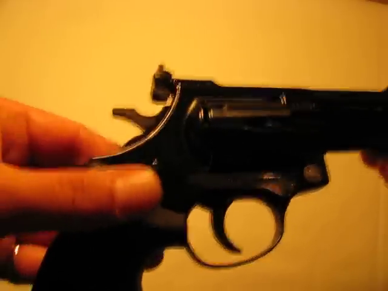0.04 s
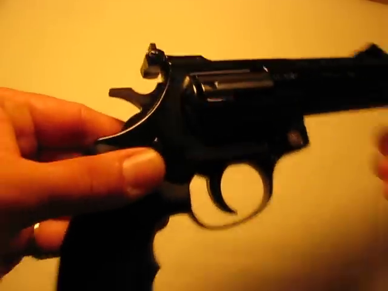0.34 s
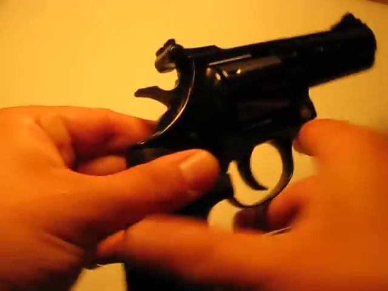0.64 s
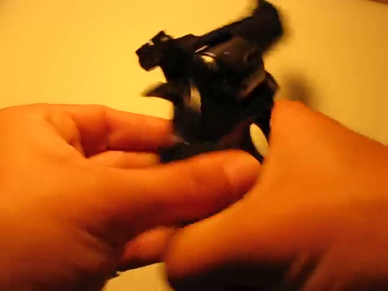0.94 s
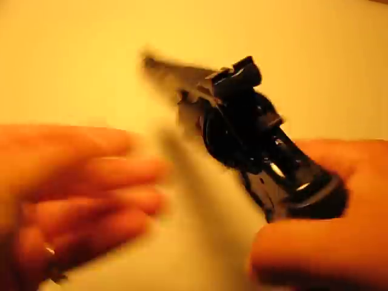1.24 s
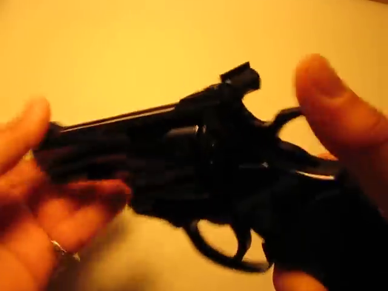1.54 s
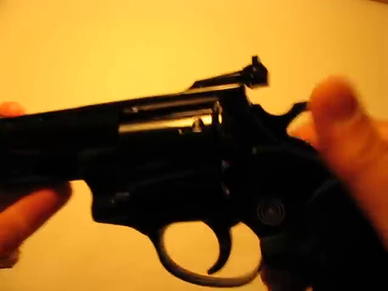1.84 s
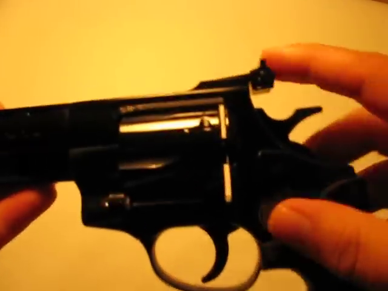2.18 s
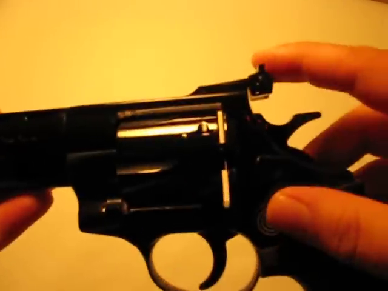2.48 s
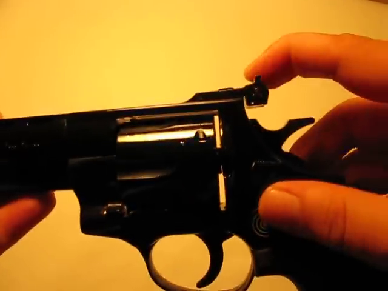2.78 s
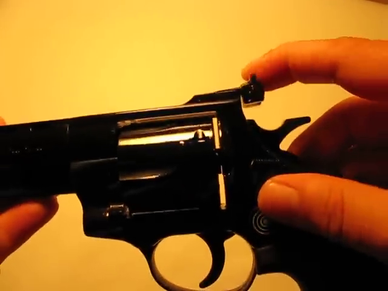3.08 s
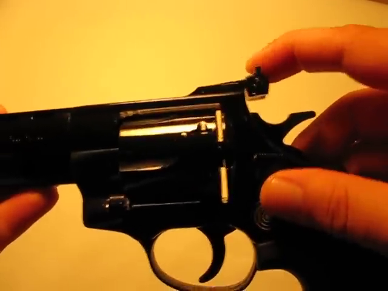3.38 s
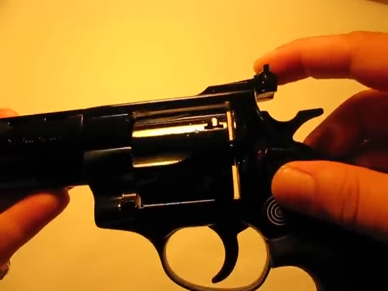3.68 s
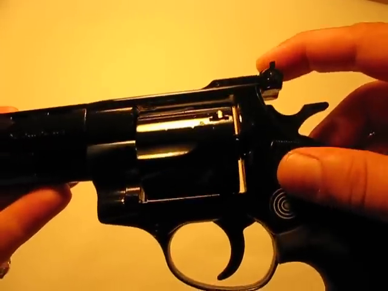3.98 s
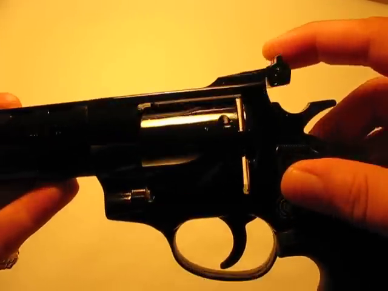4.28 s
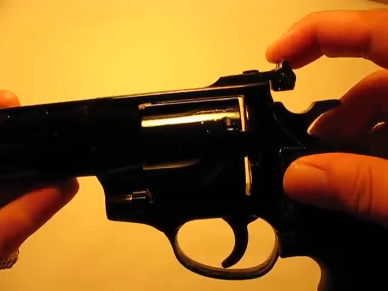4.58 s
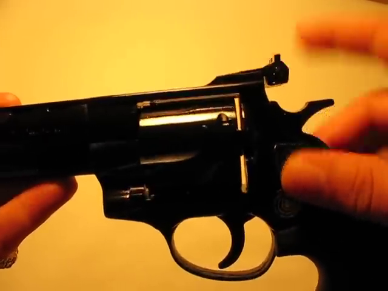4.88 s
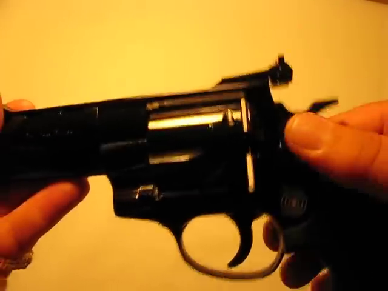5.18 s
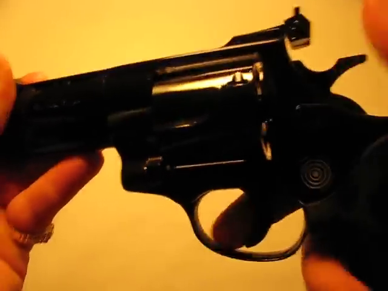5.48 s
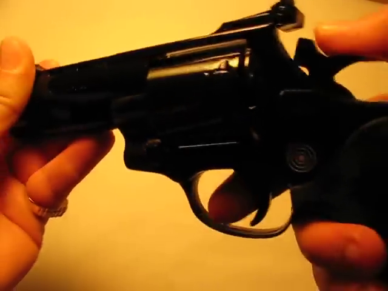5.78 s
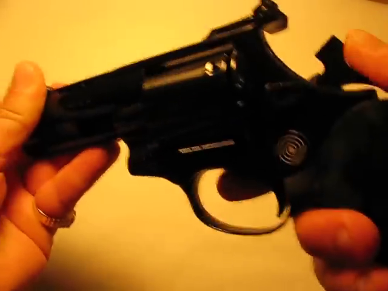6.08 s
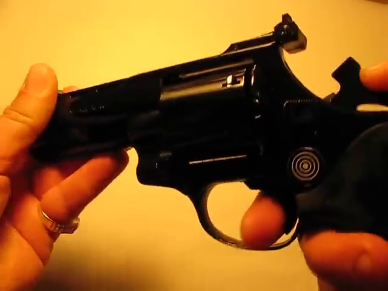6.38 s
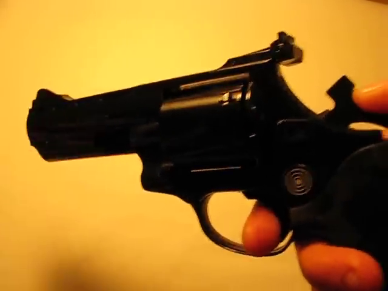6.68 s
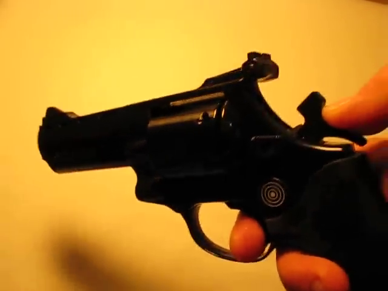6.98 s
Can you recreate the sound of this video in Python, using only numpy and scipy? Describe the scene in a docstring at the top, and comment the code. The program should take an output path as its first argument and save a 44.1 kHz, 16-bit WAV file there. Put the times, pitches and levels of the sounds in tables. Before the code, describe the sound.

A revolver bumps a table, its cylinder clicks round four times, then the hammer cocks with a hard metallic snap.

```python
"""Cocking an air revolver

Close up in a small room, hands slide over the steel and the grip thuds and clacks on a table.
The cylinder clicks through four notches with a ping; the hammer comes back on a ringing spring
and catches with a hard snap. The snap ducks the camera's gain; hiss and faint ticking creep back."""
import sys
import numpy as np
from scipy import signal
from scipy.fft import rfft, irfft, next_fast_len
from scipy.io import wavfile
from scipy.ndimage import uniform_filter1d

SR = 44100
rng = np.random.default_rng(int(sys.argv[2]) if len(sys.argv) > 2 else 0)


def wav_record(signal):
    """Record a signal, one row per channel, as 16-bit PCM in the file named by sys.argv[1]."""
    frames = np.transpose(np.atleast_2d(signal))
    bounded = np.clip(frames, -1, 1)
    # unit amplitude maps onto the largest positive 16-bit level
    quanta = np.round(bounded * 32767).astype(np.int16)
    wavfile.write(sys.argv[1], SR, quanta)


N = 319284
TIME = np.arange(N) / SR
HIT_TIME = np.arange(SR // 4) / SR


def amp(db):
    """Decibels to gain."""
    return 10 ** (np.asarray(db) / 20)


def unit_rms(x):
    """Scaled to rms 1."""
    return x / np.sqrt(np.mean(x ** 2) + 1e-20)


def unit_hit(x):
    """Scaled to the energy of 5 ms at rms 1."""
    return x * np.sqrt(.005 * SR / np.mean(np.sum(x ** 2, axis=-1)))


def curve(points, hz):
    """(frequency, value) points joined on a log frequency axis."""
    freqs, values = np.transpose(points)
    return np.interp(np.log(hz + 1), np.log(freqs + 1), values)


def add(track, at, x):
    """Mixes x into the track at a time in seconds."""
    part = track[:, round(at * SR):][:, :x.shape[-1]]
    part += x[..., :part.shape[1]]


def pan(db):
    """Left and right gains for a left-minus-right level."""
    return amp(np.vstack([db / 2, -db / 2]))


def filtered(x, response):
    """Equalises x with a gain that depends on frequency."""
    size = next_fast_len(x.shape[-1] + SR // 4)
    gain = response(np.fft.rfftfreq(size, 1 / SR))
    return irfft(rfft(x, size) * gain, size)[..., :x.shape[-1]]


# Stereo image of the air: (frequency [Hz], left-right correlation [0..1])
STEREO_LIKENESS = [(130, 0.95), (290, 0.9), (640, 0.44), (1410, .25), (3100, 0.28), (15000, 0.062)]

def stereo_noise(size):
    """White noise at two close microphones: alike in the bass, unrelated in the treble."""
    def mid_side_gains(hz):
        angle = np.arccos(np.clip(curve(STEREO_LIKENESS, hz), -1, 1)) / 2
        return np.array([np.cos(angle), np.sin(angle)])
    mid, side = filtered(rng.standard_normal((2, size)), mid_side_gains)
    return np.array([mid + side, mid - side])


def noise_bed(spectrum):
    """Steady coloured stereo noise of rms 1."""
    return unit_rms(filtered(stereo_noise(N), lambda hz: amp(curve(spectrum, hz))))


def strike(spectrum, t60, attack, width, snap=0):
    """A blow on a body: a sharp push of size snap, then dense dying modes; t60 and attack in seconds."""
    size = len(HIT_TIME)
    hz = np.fft.rfftfreq(size, 1 / SR)
    envelope = amp(-60 * HIT_TIME / t60) * (1 - np.exp(-HIT_TIME / attack))
    mid, side = rng.standard_normal((2, size)) * envelope
    burst = rfft(np.array([mid + width * side, mid - width * side]))
    local_power = uniform_filter1d(np.abs(burst) ** 2, int(4 / t60) + 1)
    burst /= np.sqrt(np.abs(local_power))  # even force across the band
    cepstrum = irfft(curve(spectrum, hz) * np.log(10) / 20, size)
    cepstrum[1:size // 2] *= 2
    cepstrum[size // 2:] = 0  # minimum phase: the body answers only after the push
    body = np.exp(rfft(cepstrum, size))
    fade = np.clip(3.8 - 4 * HIT_TIME / HIT_TIME[-1], 0, 1)
    return unit_hit(fade * irfft((burst + snap) * body, size))


def ring(modes, phase_spread=.5):
    """Free modes, struck a little differently each time; each reaches the two ears at its own phase."""
    t = np.arange(SR) / SR
    out = np.zeros((2, SR))
    for hz, db, t60 in modes:
        envelope = amp(db + rng.normal(0, 1) - 60 * t / t60)
        out += envelope * np.sin(2 * np.pi * hz * t + rng.normal(0, phase_spread, (2, 1)))
    return unit_hit(out)


# Decay of the small room: (frequency [Hz], t60 [s])
ROOM_DECAY = [(100, .42), (500, 0.24), (1200, 0.2), (2050, 0.42), (3000, 0.35), (4500, 0.3), (8000, .28),
              (15000, 0.16)]

def room_reverb(x):
    """The walls answer within milliseconds; the top of the treble dies first."""
    hz, t, spectra = signal.stft(stereo_noise(SR * 3 // 4), SR, nperseg=256)
    decay = amp(-60 * t / curve(ROOM_DECAY, hz)[:, None])
    tail = signal.istft(spectra * decay, SR, nperseg=256)[1]
    tail *= 1 - np.exp(-(np.arange(tail.shape[1]) / SR / .0033) ** 2)  # soft onset
    return signal.fftconvolve(x, tail / np.linalg.norm(tail[0]), axes=1)[:, :N]


# Colour of the noise floor: (frequency [Hz], relative level [dB])
FLOOR_EQ = [(20, -7), (40, 1.5), (70, -2.5), (160, -3.5), (250, -10), (350, -11), (470, -17.5), (560, -15),
            (750, -16), (1200, -17.5), (2060, -20.5), (8000, -26), (15800, -36)]
# Narrow bands of hum: (centre [Hz], width [Hz], relative level [dB])
HUM_BANDS = [(157, 11, -61), (440.4, 16, -66), (539.7, 8.3, -64), (590.8, 5.1, -66), (1030, 15, -68),
             (7800, 150, -75)]

def room_tone():
    """Room rumble and microphone hiss under a soft hum."""
    def hum_eq(hz):
        return sum(amp(db) / np.sqrt(width) * np.exp(-((hz - centre) / width) ** 2)
                   for centre, width, db in HUM_BANDS)
    floor = amp(-51.5) * noise_bed(FLOOR_EQ)
    hum = amp(-3.5) * np.sqrt(SR / 2) * filtered(stereo_noise(N), hum_eq)
    return floor + hum


def ticking(start_db=-51, fade_db_per_s=1.53):
    """Faint double ticks, ten pairs a second, slowly weakening."""
    out = np.zeros((2, N))
    tick_eq = [(150, -23), (350, 3.5), (600, -15.5), (850, -12.5),
               (1120, -2), (1400, -1), (1750, -21), (5000, -36.5)]
    for at in np.arange(.037, N / SR, .1):
        for delay in (0, .021):
            db = start_db - fade_db_per_s * at + rng.normal(0, 2.7)
            add(out, at + delay, amp(db) * strike(tick_eq, t60=.046, attack=.002, width=.18))
    return out


def swell(at, half_length, db):
    """A bell-shaped rise and fall in level."""
    return amp(db) * np.exp(-((TIME - at) / half_length) ** 2)


def low_swell():
    """A soft bass bloom just after the snap."""
    bass = noise_bed([(40, -22.5), (72, 2), (110, -23), (400, -72)])
    return swell(at=6.24, half_length=.22, db=-47.5) * bass


# A hand slides along the steel: (time [s], half length [s], level [dB])
HAND_STROKES = [(1.023, 0.082, -46.5), (1.77, 0.096, -57), (2.144, 0.032, -58.5), (5.4, 0.032, -55),
                (5.535, 0.043, -52), (5.783, 0.042, -51.5)]
# The grip shifts in the hand: (time [s], half length [s], level [dB])
GRIP_SHIFTS = [(1.6, .5, -51.5), (2.65, 0.4, -55), (5.72, 0.16, -54.5)]
# Whisper of skin on steel: (frequency [Hz], relative level [dB])
SKIN_EQ = [(900, -20.5), (1600, -6), (2000, -1.5), (2330, 3), (2700, -3), (3600, -3), (5200, -2),
           (8000, -8), (15000, -17)]

def hands(hold_db=-63, brush_db=-10, rasp_db=2):
    """Skin sticks and slips over the steel; a still hand rumbles, and each shift adds rumble and brush."""
    shifting = sum(swell(*shift) for shift in GRIP_SHIFTS)
    sliding = sum(swell(*stroke) for stroke in HAND_STROKES) + amp(brush_db) * shifting
    stick_slip = unit_rms(uniform_filter1d(rng.standard_normal(N), size=300))
    rumble_eq = [(25, -13), (100, 3.5), (200, -3.5), (450, -9), (900, -15), (3000, -32.5)]
    rumble = (amp(hold_db) + shifting) * noise_bed(rumble_eq)
    return rumble + sliding * amp(rasp_db * stick_slip) * noise_bed(SKIN_EQ)


# The grip lands: (time [s], relative level [dB], hardness [dB], clack pitch [ratio])
GRIP_LANDINGS = [(0.0412, -26, 13, 1.007), (0.0517, -32.5, 9.5, 1.04), (2.269, -25.5, -3, 1.195),
                 (2.574, -36, -11, 1.1), (2.608, -41.5, -14, 1), (2.836, -34.5, -10, 0.82),
                 (3.147, -33.5, -7.5, 1.05), (5.025, -23.5, 9, 1.177)]
# Deep thud, hard clack and bright gun rattle: (frequency [Hz], relative level [dB])
THUD_EQ = [(25, -10), (80, 6.5), (135, 2.5), (175, -1), (230, 1.5), (310, -3.5), (480, -14), (900, -20.5),
           (2000, -50.5)]
CLACK_EQ = [(200, -24.5), (430, -6.5), (570, -7), (690, -1), (850, -7.5), (1000, -10), (1200, 0.5),
            (1380, -15), (3000, -21.5), (8000, -54)]
RATTLE_EQ = [(900, -28.5), (2000, -6), (2900, -3.5), (3600, -4.5), (4300, -3.5), (4650, 0.5), (5200, -7.5),
             (7500, -14), (10000, -13), (15500, -25)]
# Short ring of table top and gun body: (frequency [Hz], relative level [dB], t60 [s])
TABLE_RING = [(492, -5, 0.093), (712, 2.5, 0.097), (860, -1, 0.038), (1026, -4.5, 0.077), (1134, -7, 0.026),
              (1364, -2, 0.074), (1500, -0.5, .05)]
GUN_RING = [(2890, -7, 0.031), (3898, -7, 0.051), (4640, -4, 0.04), (7450, -9.5, 0.033)]
# Placement of the bumps: (frequency [Hz], left minus right [dB])
BUMP_PAN = [(200, 2), (400, 0.5), (700, 4), (1290, -6.5), (2400, 2), (8000, -0.5)]

def table_bumps(rattle_db_per_octave=19.5):
    """The table top thuds under the grip; a hard landing also clacks and rattles the gun."""
    out = np.zeros((2, N))
    for at, db, hardness_db, pitch in GRIP_LANDINGS:
        contact = at + .0034  # the grip gives way before the hard contact
        clack_eq = [(hz * pitch, level) for hz, level in CLACK_EQ]  # stiffer sounds higher
        clack_db = db + hardness_db
        damping_db = 1.9 * min(hardness_db, 0)  # a soft landing smothers the rattle
        rattle_db = clack_db - 6 + rattle_db_per_octave * np.log2(pitch) + damping_db
        add(out, at, amp(db + 4) * strike(THUD_EQ, t60=.19, attack=.00048, width=.25, snap=.33))
        add(out, contact, amp(clack_db) * strike(clack_eq, t60=.037, attack=.0017, width=.77, snap=.17))
        add(out, contact, amp(clack_db - 9) * ring(TABLE_RING, phase_spread=.7))
        add(out, contact, amp(rattle_db) * strike(RATTLE_EQ, t60=.025, attack=.0018, width=.9))
        add(out, contact, amp(rattle_db - 10.5) * ring(GUN_RING, phase_spread=.99))
    return filtered(out, lambda hz: pan(curve(BUMP_PAN, hz)))


# The stop drops into a notch: (time [s], relative level [dB], ring offset [dB])
NOTCH_CLICKS = [(3.0942, -17.5, -6.5), (3.6464, -18.5, -2.5), (4.1819, -27, -3.5), (4.725, -17.5, -2.2)]
# Crisp click of the stop, and the ping off the walls: (frequency [Hz], relative level [dB])
STOP_EQ = [(300, -53.5), (620, -13.5), (1200, -27), (1650, -12), (2050, -11.5), (2600, -10), (3600, -13.5),
           (4700, -22), (5500, -2), (7000, -1.5), (7650, -11.5), (8350, -2), (10000, -16.5), (14000, -21.5),
           (16000, -30)]
ECHO_EQ = [(1500, -30), (1880, -20), (1990, -5), (2060, -9), (2150, -13.5), (2350, -33), (3000, -49)]
# Ping of the cylinder: (frequency [Hz], relative level [dB], t60 [s])
CYLINDER_RING = [(2020, 3.5, 0.041), (2100, -7, .025), (1572, -17.5, 0.09), (5940, -8, 0.015),
                 (6670, -9.5, 0.031), (8200, -10, 0.036)]
# Wall echoes: (delay [s], level against the ping [dB])
WALL_ECHOES = [(.024, -12.5), (0.111, -29.5)]

def cylinder(rebound_s=.0032):
    """The stop snaps into each notch, rebounds once and rings the cylinder; the walls return the ping."""
    out = np.zeros((2, N))
    for at, db, ring_db in NOTCH_CLICKS:
        add(out, at, amp(db + .4) * strike(STOP_EQ, t60=.009, attack=.0002, width=.8, snap=1.1))
        add(out, at + rebound_s, amp(db - 7) * strike(STOP_EQ, t60=.026, attack=.00016, width=.44))
        add(out, at, amp(db + ring_db) * ring(CYLINDER_RING, phase_spread=.75))
        for delay, wall_db in WALL_ECHOES:
            echo = strike(ECHO_EQ, t60=.15, attack=.003, width=.6)
            add(out, at + delay, amp(db + ring_db + wall_db) * echo)
    placement = [(1000, -1), (2000, -2), (4500, -1), (8000, 2.5)]
    return filtered(out, lambda hz: pan(curve(placement, hz)))


# Contacts inside the lock work: (time [s], level [dB], brightness [dB/octave])
LEVER_TICKS = [(1.7121, -35, -3.5), (5.6146, -50.5, -1.5), (5.6895, -35.5, 6.5), (5.7535, -38, 1),
               (5.7707, -29.5, 0.5), (5.7805, -37.5, -3), (5.792, -35.5, -3), (5.7982, -39.5, -4.5),
               (5.848, -15.5, 5.5), (5.9328, -16, -3.5), (7.0664, -35, -.5)]
# Dry lever tick and sizzling spring clash: (frequency [Hz], relative level [dB])
LEVER_EQ = [(400, -20.5), (800, -18), (1400, -8), (2350, -4), (3200, -4.5), (4600, -0.5), (5600, 0.5),
            (7700, -6), (11000, -15), (16000, -27)]
SPRING_EQ = [(7500, -44), (9600, -16.5), (11400, -12), (12000, -2), (12330, 4.5), (12700, -10),
             (13400, -13), (15500, -25)]
# Thin spring twang and long frame ring: (frequency [Hz], relative level [dB], t60 [s])
SPRING_MODES = [(12460, -4, .17), (12240, -9, .14)]
FRAME_MODES = [(2164, -8.5, 1.3), (4140, -3, 0.91), (2050, 1, .35), (7940, -12, .45)]

def lock_work(slack_db=-32, clash_growth=2.96):
    """Levers tick and ring the frame; contacts harder than the slack also clash and twang the spring."""
    out = np.zeros((2, N))
    for at, db, tilt in LEVER_TICKS:
        tick_eq = [(hz, level + tilt * np.log2(hz)) for hz, level in LEVER_EQ]  # sharper is brighter
        add(out, at, amp(db) * strike(tick_eq, t60=.018, attack=.00024, width=.42, snap=.32))
        add(out, at, amp(db - 26.5) * ring(FRAME_MODES))
        force_db = db - slack_db
        if force_db > 0:
            clash = strike(SPRING_EQ, t60=.012, attack=.0001, width=.62, snap=1)
            add(out, at, amp(-50 + clash_growth * force_db) * pan(5.7) * clash)
            add(out, at, amp(db - 7.5) * ring(SPRING_MODES, phase_spread=.68))
    return out


# Hard snap at full cock: (frequency [Hz], relative level [dB])
SNAP_EQ = [(90, -22.5), (200, -23), (600, -13.5), (1100, -28), (2000, -10), (2800, -11), (3450, -.5),
           (4000, -1.5), (4600, -.5), (5700, -6.5), (6900, -10), (7900, -5), (10000, -17.5), (12400, -15.5),
           (16000, -27)]

def sear(scrape_at=5.908, catch_at=5.9599, catch_db=7.5):
    """The sear scrapes along the hammer, then catches it with a snap that rings the frame."""
    out = np.zeros((2, N))
    scrape_eq = [(2000, -24), (6000, -16.5), (9500, .5), (12300, -3), (15500, -17)]
    add(out, scrape_at, amp(-24.5) * strike(scrape_eq, t60=.12, attack=.02, width=.81))
    add(out, catch_at, amp(catch_db) * strike(SNAP_EQ, t60=.0052, attack=.00015, width=.4, snap=.94))
    add(out, catch_at, amp(catch_db - 11) * strike(SNAP_EQ, t60=.017, attack=.001, width=.7))
    add(out, catch_at, amp(catch_db - 38.5) * ring(FRAME_MODES))
    return out


def hammer():
    """The hammer comes back through the ticking lock work until the sear holds it."""
    placement = [(1000, -.5), (3400, -3), (4500, 1.5), (8000, 1.5), (12000, -.5)]
    return filtered(lock_work() + sear(), lambda hz: pan(curve(placement, hz)))


def scene():
    """The gun is close, so its direct sound stands well above the room."""
    turns, cocking, bumps = cylinder(), hammer(), table_bumps()
    reverb = room_reverb(amp(-19.5) * turns + amp(-16.5) * cocking + amp(-13.5) * bumps)
    return turns + cocking + bumps + reverb + hands() + low_swell() + room_tone() + ticking()


def gain_control(x, limit_db, recovery_db_per_s, attack_s):
    """The gain ducks at once on a loud peak and climbs steadily back."""
    power = np.abs(uniform_filter1d(np.mean(x ** 2, axis=0), size=130))
    excess_db = np.maximum(10 * np.log10(power + 1e-12) - limit_db, 0)
    recovery_db = recovery_db_per_s * TIME
    duck_db = np.maximum.accumulate(excess_db + recovery_db) - recovery_db
    pole = np.exp(-1 / (attack_s * SR))
    return x * amp(-signal.lfilter([1 - pole], [1, -pole], duck_db))


def record(dry):
    """The camera ducks loud peaks, clips at full scale and cuts the highest treble."""
    levelled = gain_control(dry, limit_db=-10, recovery_db_per_s=14.5, attack_s=.00029)
    top_hz = 15900
    return filtered(np.clip(levelled, -1, 1), lambda hz: np.clip((top_hz - hz) / 400 + .5, 0, 1))


dry = scene()
out = record(dry)
wav_record(out)
```